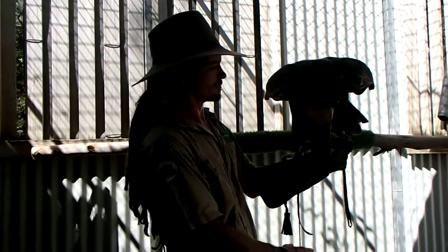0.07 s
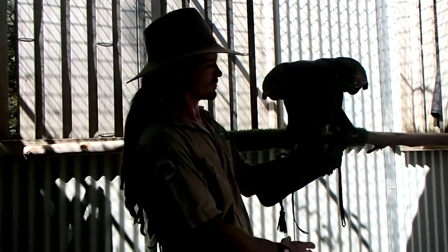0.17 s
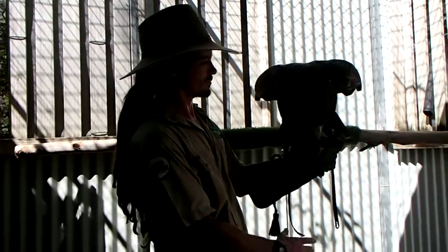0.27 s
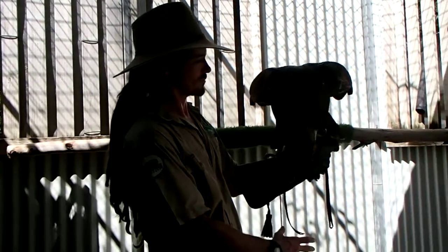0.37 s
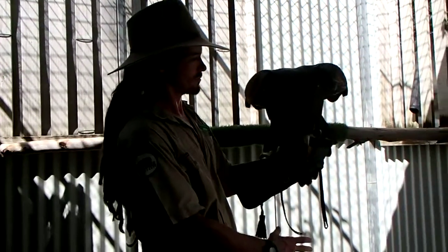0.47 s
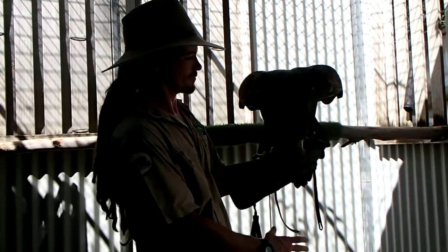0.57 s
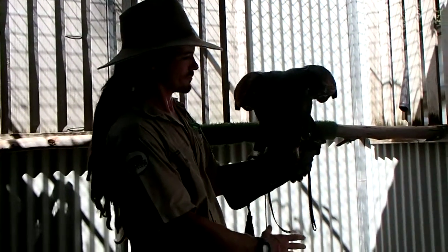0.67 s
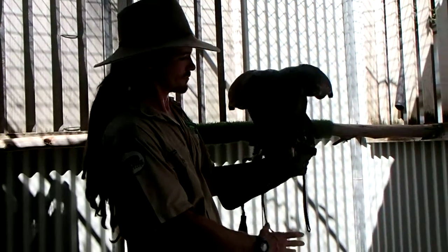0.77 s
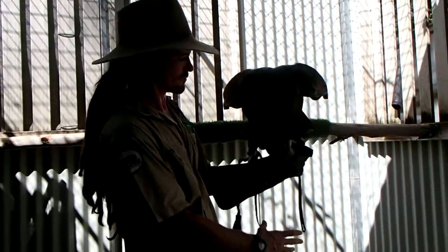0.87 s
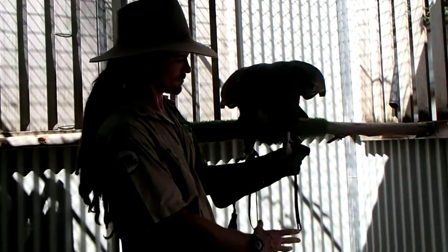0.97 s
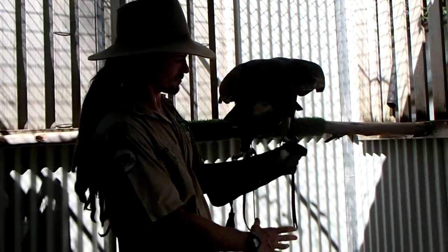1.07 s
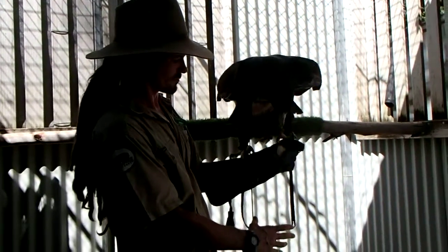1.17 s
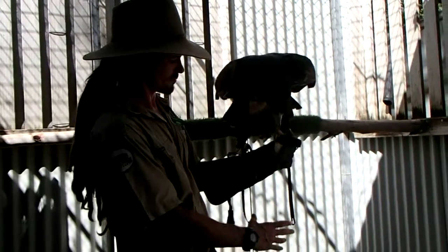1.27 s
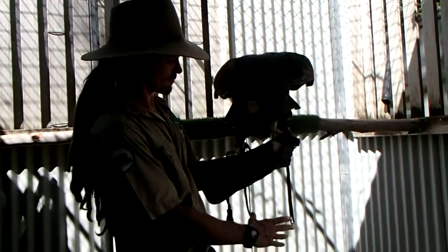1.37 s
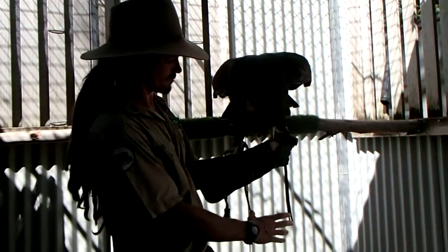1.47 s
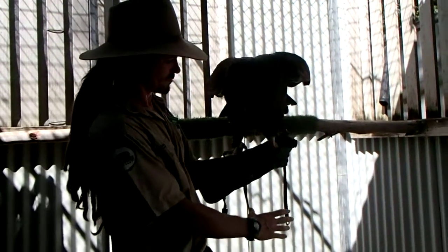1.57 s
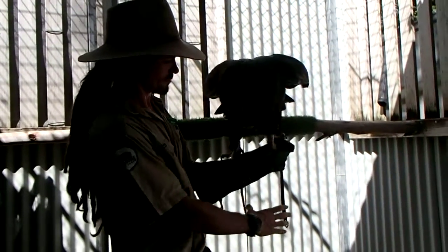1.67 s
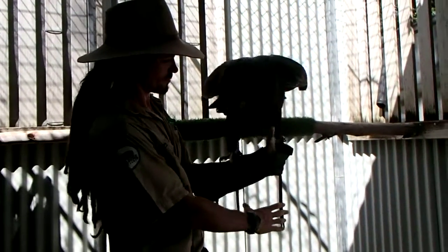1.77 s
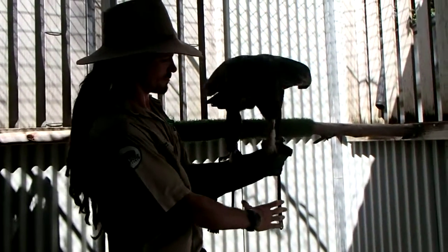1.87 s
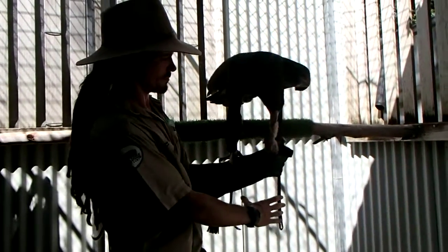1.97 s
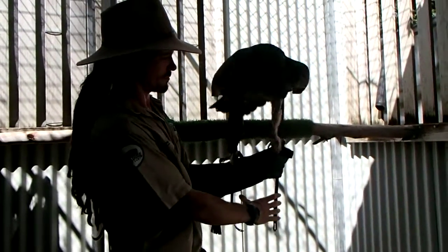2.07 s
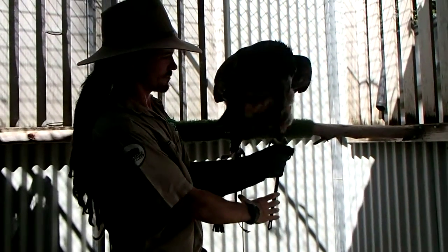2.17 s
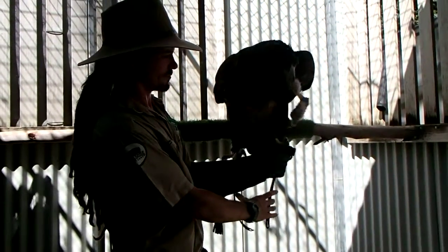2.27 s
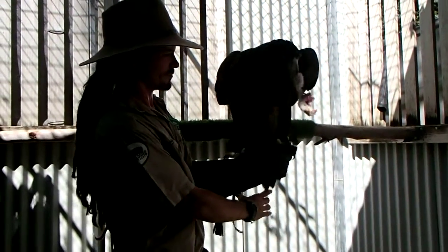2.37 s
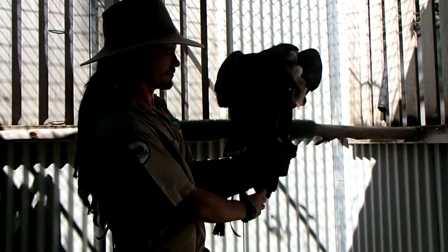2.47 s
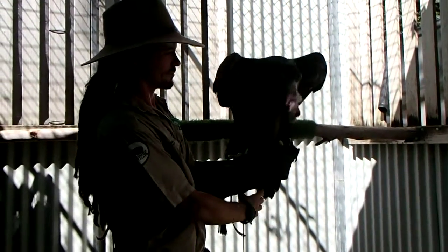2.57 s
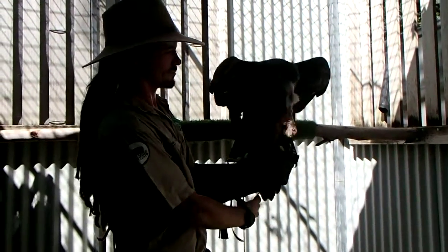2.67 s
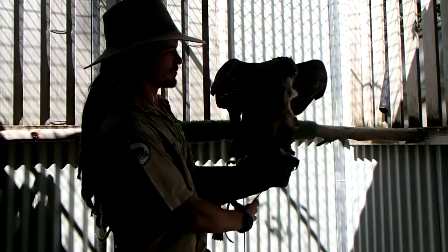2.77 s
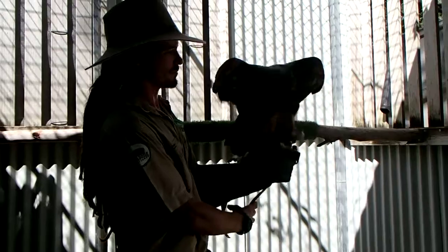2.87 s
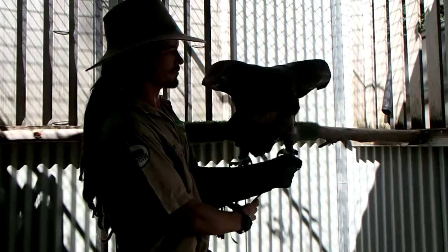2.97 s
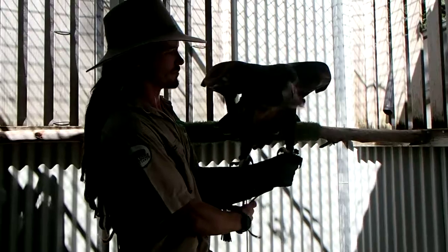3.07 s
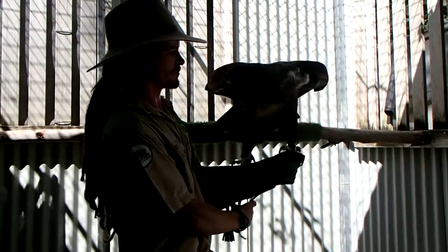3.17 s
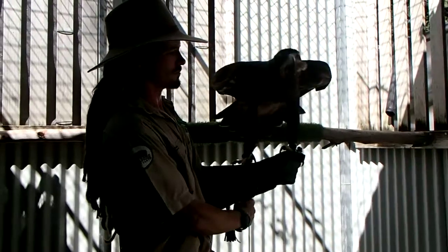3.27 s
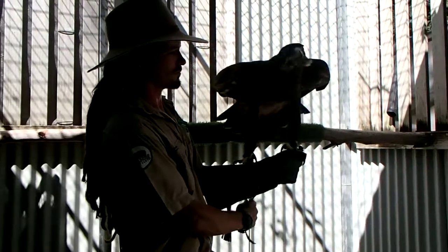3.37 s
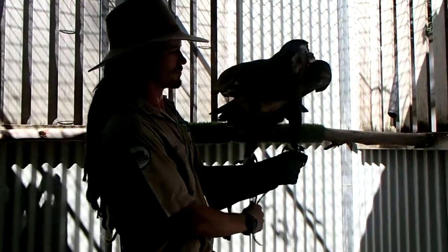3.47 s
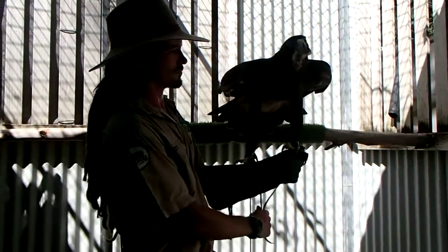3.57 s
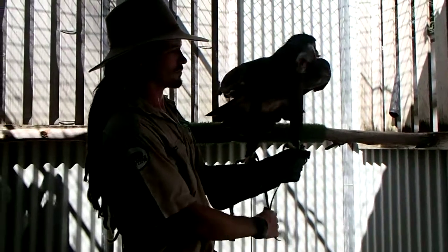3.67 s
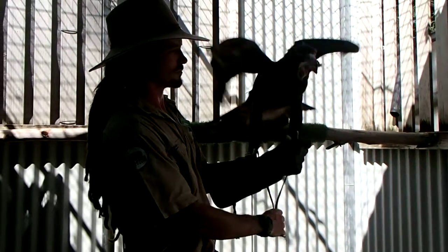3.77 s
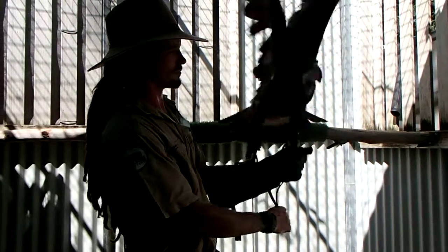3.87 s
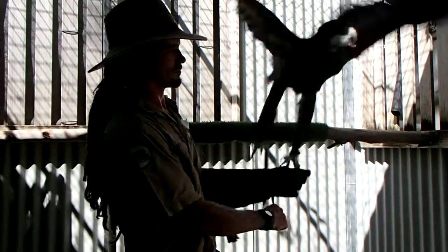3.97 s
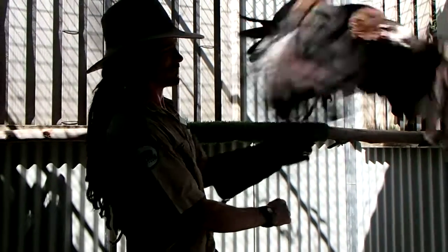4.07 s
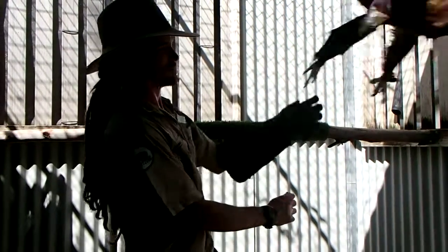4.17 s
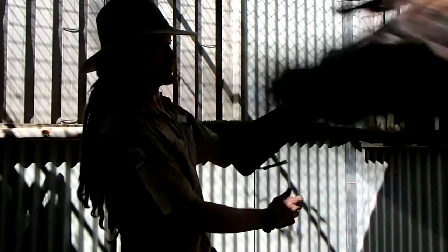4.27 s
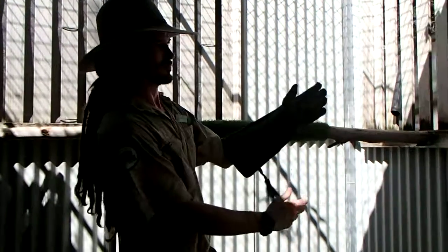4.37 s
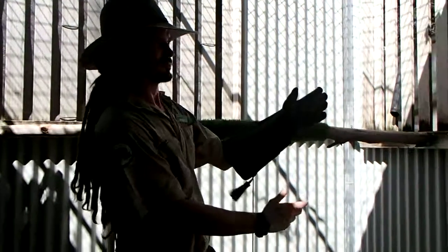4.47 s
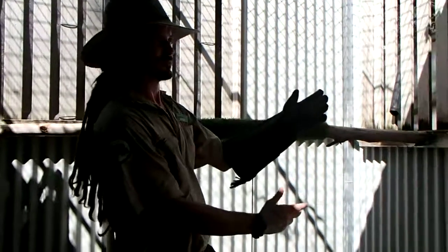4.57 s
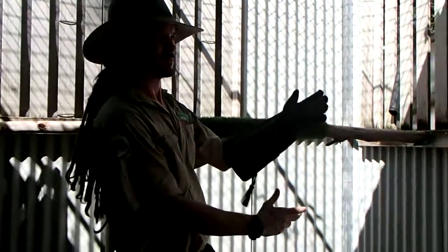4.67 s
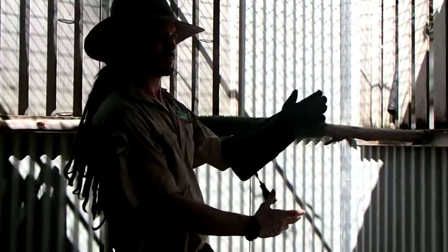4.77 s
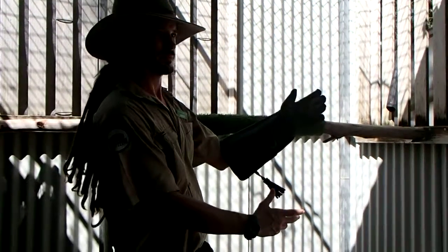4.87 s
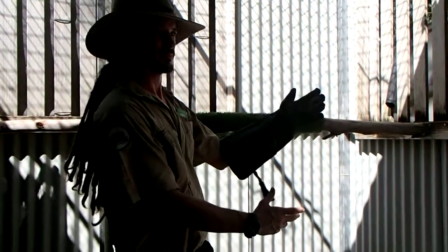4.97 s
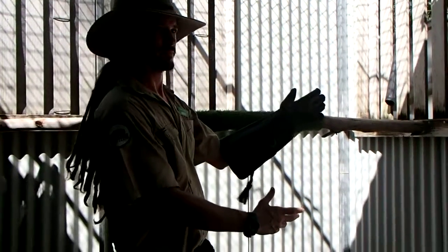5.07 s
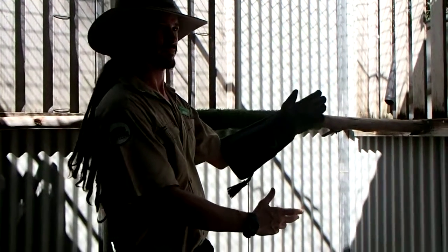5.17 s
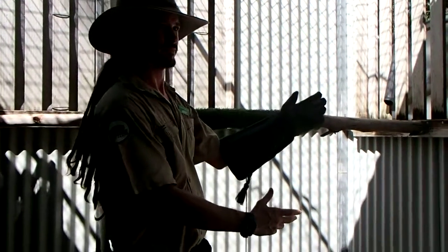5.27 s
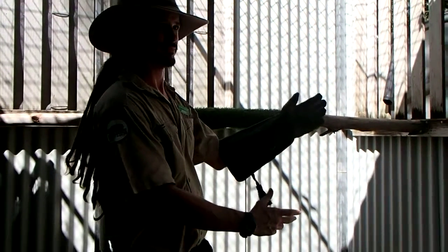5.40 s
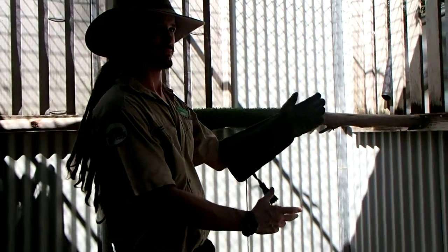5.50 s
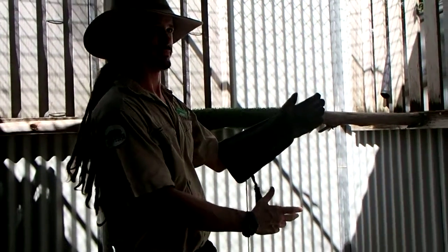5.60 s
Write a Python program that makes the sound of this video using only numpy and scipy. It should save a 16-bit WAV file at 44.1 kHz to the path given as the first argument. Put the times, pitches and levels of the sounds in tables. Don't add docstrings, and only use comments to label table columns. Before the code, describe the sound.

Quiet open air with a faint far motor and thin, high bird notes. Soft evenly spaced knocks and a plasticky tick come first, then light feather shuffles and tiny strap clicks. Suddenly wings explode into dry snaps and grainy whooshes very near the microphone, followed by low lumpy air bumps. Later strokes are softer, with scratchy claw rasps; the snaps get a short reflection from the aviary walls.

```python
import sys
import numpy as np
from scipy import signal
from scipy.fft import rfft, irfft, next_fast_len
from scipy.io import wavfile
from scipy.ndimage import uniform_filter1d

SR = 44100
rng = np.random.default_rng(int(sys.argv[2]) if len(sys.argv) > 2 else 0)


def dump(signal):
    limited = np.clip(np.atleast_2d(signal).T, -1, 1)
    pcm = np.round(limited * 32767).astype(np.int16)
    wavfile.write(sys.argv[1], SR, pcm)


def volts_from_decibels(level):
    exponent = np.asarray(level, float) / 20
    return 10 ** exponent


N = 248724
T = np.arange(N) / SR


def unit(x):
    return x / np.sqrt(np.mean(x ** 2) + 1e-20)


def along(points, hz):
    f, v = np.transpose(points)
    return np.interp(np.log(hz + 1), np.log(f + 1), v)


def wobble(rate):
    knots = rng.standard_normal(round(N / SR * 600))
    return np.interp(T * rate, np.arange(len(knots)), knots)


def filtered(x, response):
    m = next_fast_len(x.shape[-1] + 4096, True)
    spectrum = rfft(x, m) * response(np.fft.rfftfreq(m, 1 / SR))
    return irfft(spectrum, m)[..., :x.shape[-1]]


def resonance(centre_hz, width_hz):
    return lambda f: 1j * f * width_hz / (centre_hz ** 2 - f * f + 1j * f * width_hz)


def rush(spectrum, patchy_db, grain_db):
    grains = rng.standard_normal(N) * volts_from_decibels(grain_db * wobble(500))
    z = signal.stft(grains, nperseg=256)[2]
    field = uniform_filter1d(rng.standard_normal(z.shape), 5, axis=0)
    field = uniform_filter1d(field, 8, axis=1)
    noise = signal.istft(z * volts_from_decibels(patchy_db * unit(field)), nperseg=256)[1][:N]
    return unit(filtered(noise, lambda hz: volts_from_decibels(along(spectrum, hz))))


def swells(rows):
    s, db, rise, fall = np.transpose(rows)[:, :, None]
    ms = T[::44]
    down_db = 20 * np.maximum((s - ms) / rise, (ms - s) / fall)
    return np.interp(T, ms, np.sqrt(np.sum(volts_from_decibels(2 * db - down_db), axis=0)))


# (frequency [Hz], density [dB per Hz])
AIR = [(25, -29), (60, -17.5), (108, -5.5), (200, -9.5), (516, -9.5), (754, -4.5), (1290, -5.5),
       (1560, -8.5), (2600, -8), (3400, -4.5), (4300, -8.5), (5300, -16), (13600, -23), (16000, -30)]
# (frequency [Hz], rms level [dB])
HUM = [(104, -73), (139, -70)]


def air():
    bed = volts_from_decibels(-50.5 + 0.27 * wobble(8.3)) * rush(AIR, 1.2, 0.55)
    for hz, db in HUM:
        level = volts_from_decibels(db + 2 + 1.6 * wobble(3.73))
        bed = bed + level * np.sin(2 * np.pi * hz * T + 0.55 * wobble(3.9))
    return bed


# (time [s], peak level [dB], t60 [s])
QUILLS = [(.0166, -38, .02), (.505, -37.5, .02), (1.5564, -46, .02), (3.8585, -30, .015),
          (3.906, -24, .017), (3.9613, -12.5, .027), (3.9664, -15.5, .02), (3.9911, -7.5, .016),
          (4.0005, 3, .014), (4.0055, -4, .031), (4.0108, -12, .03), (4.1054, -16, .015),
          (4.4912, -24, .035), (4.5295, -18, .0093), (4.534, -11, .023)]
TIP_FLICKS = [(1.9844, -42, .01), (2.4111, -32, .012), (2.9282, -38, .012), (3.9967, -1.5, .012),
              (4.0194, -12.5, .02), (4.2115, -4, .022), (4.267, -5.5, .019), (4.275, -9, .025)]
STRAP_TICKS = [(1.649, -33, .015), (2.725, -36, .012), (2.7574, -22, .013), (4.2158, -24, .028),
               (4.282, -14, .025)]
FIZZ = [(2.4105, -45, .025), (3.9965, -23, .015), (4.002, -30, .09), (4.212, -33, .12), (4.268, -32, .12),
        (4.447, -38, .015), (4.619, -36, .012)]
SLAPS = [(1.8889, -45, .02), (4.7694, -27, .0052), (4.799, -27, .017), (4.8758, -18.5, .0025),
         (5.142, -34, .038)]
# (its snaps, dull part [dB re peak], bright part [dB re peak])
KINDS = [(QUILLS, -6.5, -18), (TIP_FLICKS, -12, -8), (STRAP_TICKS, -21, -17), (SLAPS, 6.5, -15),
         (FIZZ, -20, 16)]


def snaps():
    out, t = np.zeros(N + SR), np.arange(2048) / SR
    rows = sorted((*snap, dull_db, bright_db) for kind, dull_db, bright_db in KINDS for snap in kind)
    crackle = rng.standard_normal((len(rows), len(t)))
    crackle[:, 0] = 2.6
    s, db, t60, dull_db, bright_db = np.transpose(rows)[:, :, None]
    dull, middle, bright = resonance(1340, 2070), resonance(3050, 2260), resonance(11500, 14000)

    def colour(f):
        low = volts_from_decibels(dull_db + 5.5) * dull(f) ** 2
        high = volts_from_decibels(bright_db - 14) * bright(f) ** 2
        return volts_from_decibels(2.5) * middle(f) ** 2 - low + high

    sounds = filtered(crackle * volts_from_decibels(db - 60 * t / t60), colour)
    for start, sound in zip(s[:, 0], sounds):
        out[round(start * SR):][:len(t)] += sound
    return out[:N]


# (time [s], rise [s], fall of 20 dB [s], level [dB], resonance [Hz])
SCRAPE = [(.03, .017, .03, -40.5, 950), (.04, .015, .05, -48, 2050), (1.705, .0036, .1, -52, 900),
          (1.889, .0032, .06, -50, 750), (1.984, .002, .006, -56, 6000), (2.41, .003, .04, -48, 2750),
          (2.758, .003, .02, -36.5, 3030), (2.931, .053, .3, -56, 4000), (3.45, .1, .5, -61, 5200),
          (4.535, .006, .1, -29.5, 3350), (5.268, .0079, .1, -35.5, 1000), (5.302, .015, .15, -29.5, 3260),
          (5.381, .012, .35, -31.5, 1070), (5.523, .0085, .08, -32, 1030)]


def scrape():
    out, t, rows = np.zeros(N + SR), np.arange(SR // 3) / SR, SCRAPE + swivel()
    for (s, rise, fall, db, hz), noise in zip(rows, rng.standard_normal((len(rows), len(t)))):
        shape = np.minimum(t / rise, volts_from_decibels(-20 * (t - rise) / fall))
        body = resonance(hz, 450 * (hz / 1000) ** .25)
        rasp = shape * filtered(noise, lambda f: body(f) ** 2)
        out[round(s * SR):][:len(t)] += volts_from_decibels(db) * rasp * np.linalg.norm(shape) / np.linalg.norm(rasp)
    return out[:N]


# (frequency [Hz], density [dB per Hz])
VANES = [(880, -33), (1500, -5.5), (2180, -3), (2350, -5), (3030, 1), (4480, -4), (5490, -14.5),
         (9000, -31.5), (11700, -38), (19800, -120)]
BODY = [(120, -45), (200, -12), (455, -7), (529, -8.5), (591, -4), (823, -1), (1080, -1.5), (2200, -8),
        (2860, -10), (4840, -120)]
TIPS = [(3530, -26), (6000, -1), (9310, -7), (14300, -6.5), (15200, -6), (16000, -35)]
# (peak time [s], rush [dB], rise of 10 dB [s], fall of 10 dB [s], wing body [dB re rush])
SHUFFLES = [(.046, -44.5, .048, .06, -3), (1.576, -55, .04, .04, 1), (1.654, -52, .02, .15, -10),
            (2.178, -44, .085, .018, -11), (3.0, -56, .08, .15, -13)]
STROKES = [(3.84, -40, .1, .2, -8), (3.94, -41, .06, .05, 0), (4.012, -30.5, .08, .15, -5),
           (4.103, -26, .07, .085, -6), (4.218, -28, .012, .04, -6), (4.285, -31, .035, .04, -3),
           (4.362, -29.5, .055, .06, -3), (4.425, -36, .05, .05, -3), (4.494, -33.5, .025, .035, -7),
           (4.55, -35, .04, .1, -6), (4.635, -33, .05, .07, -8), (4.75, -40, .08, .045, -8),
           (4.815, -39, .035, .09, -1), (5.03, -47.5, .3, .25, -4), (5.155, -37, .015, .11, 2.5),
           (5.33, -36, .05, .08, -5), (5.43, -33, .09, .09, 0), (5.54, -40, .06, .17, 1.5)]
# (time [s], level [dB re rush])
TIPS_DB = [(.1, -27), (.4, -13), (4.7, -14), (4.9, -21), (5.2, -26.5)]


def feathers():
    flutter = volts_from_decibels(0.8 * wobble(35))
    vanes, body, tips = rush(VANES, 1.43, 1.4), rush(BODY, 1.7, 1.9), rush(TIPS, 1.36, 2.1)
    rows = SHUFFLES + STROKES
    slide = swells([row[:-1] for row in rows])
    whoosh = swells([(s, db + body_db, rise, fall) for s, db, rise, fall, body_db in rows])
    tips_db = np.interp(T, *np.transpose(TIPS_DB))
    hiss = volts_from_decibels(tips_db + 1.71) * tips
    return flutter * (slide * (vanes + hiss) + volts_from_decibels(2.0) * whoosh * body)


# (time [s], length [s], start pitch [Hz], end pitch [Hz], rms level [dB])
WHISTLES = [(.1, .06, 5400, 5420, -68), (.3, .19, 5140, 5100, -67), (.43, .09, 4020, 3960, -59),
            (.64, .043, 2950, 2915, -59), (.73, .08, 2880, 2880, -58), (1.0, .45, 6250, 6300, -73),
            (1.18, .05, 2950, 2960, -60), (2.1, .08, 4020, 4080, -57), (2.12, .07, 3280, 3250, -56),
            (2.413, .075, 3270, 3300, -55), (2.445, .05, 2750, 2770, -55.5), (2.47, .16, 2760, 2720, -59.5),
            (2.62, .12, 2690, 2610, -63), (2.5, .14, 5520, 5560, -68), (2.52, .08, 4280, 4240, -60),
            (2.61, .08, 4260, 4400, -56.5), (2.69, .08, 4340, 4360, -58.5), (2.64, .065, 5300, 5178, -65),
            (2.7, .07, 5550, 5750, -66), (2.85, .05, 3600, 3580, -62), (3.09, .09, 2960, 2950, -59.5),
            (.32, .25, 189, 186, -67), (.3, .13, 389, 385, -69), (.6, .2, 182, 178, -70)]


def whistles():
    out, waver = np.zeros(N), 1.6 * wobble(80)
    for s, length, start_hz, end_hz, db in WHISTLES + chorus():
        u = np.linspace(0, 1, round(length * SR))
        start = round(s * SR)
        phase = 2 * np.pi * length * (start_hz * u + (end_hz - start_hz) * u * u / 2)
        phase = phase + start_hz / 3500 * waver[start:][:len(u)]
        swell = np.abs(np.sin(np.pi * u)) ** 0.34
        out[start:][:len(u)] += volts_from_decibels(db + 3.0) * swell * np.sin(phase)
    return out * volts_from_decibels(1.9 * wobble(60))


# (rate [notes a second], lowest pitch [Hz], highest pitch [Hz], rms level [dB])
CHORUS = (14, 2600, 5300, -70)


def chorus():
    rate, low_hz, high_hz, db = CHORUS
    when, span, pitch, bend, size = rng.uniform(size=(round(rate * N / SR), 5)).T
    hz = low_hz * (high_hz / low_hz) ** pitch
    end_hz = hz * (1.02 - .04 * bend)
    return list(zip(when * (N / SR - .2), .03 + .09 * span, hz, end_hz, db + 6 * size - 3))


# (first time [s], period [s], number of knocks, level [dB])
SWIVEL = (0.3, .1342, 6, -51)


def swivel():
    first, period, knocks, db = SWIVEL
    return [(first + k * period, .004, .014, db, 1300) for k in range(round(knocks))]


# (time [s], peak level [dB])
TAP = [(1.3493, -15), (1.35, -6)]
# (frequency [Hz], width [Hz], level [dB])
CASE = [(250, 250, -9), (735, 104, -1.5), (1420, 120, -4), (3300, 270, -0.5), (4400, 430, -8),
        (5750, 460, -7.5), (8800, 610, -34), (12600, 1500, -40)]


def tap():
    blow = np.zeros(N)
    for s, db in TAP:
        blow[round(s * SR)] = volts_from_decibels(db + 23.5)

    def case(f):
        return sum((-1) ** k * volts_from_decibels(db) * resonance(c, w)(f) for k, (c, w, db) in enumerate(CASE))

    return filtered(blow, case)


# (peak time [s], level [dB], rise of 10 dB [s], fall of 10 dB [s])
GUSTS = [(4.23, -45, .15, .2), (4.43, -44, .15, .1), (4.53, -34, .08, .06), (4.584, -23.5, .025, .014),
         (4.67, -29, .025, .045), (4.765, -36, .015, .15), (4.87, -36, .1, .06), (5.022, -31, .035, .06),
         (5.11, -33, .05, .05), (5.155, -31, .03, .05), (5.248, -31, .03, .025), (5.418, -39, .2, .1),
         (5.63, -41, .15, .2)]
# (frequency [Hz], density [dB per Hz])
BUFFET = [(15, -45), (35, -22), (90, -0.5), (160, 1.5), (300, -6), (500, -18), (900, -35), (1500, -120)]
# (time [s], peak level [dB], frequency [Hz], life [cycles])
EDDIES = [(4.001, -33.5, 130, .3), (4.495, -28, 220, .66), (4.5675, -7.5, 215, .78), (4.5712, -12, 680, .6),
          (4.5752, -7.5, 850, .8), (4.5782, -5.5, 800, 1.1), (4.6499, -13, 704, 1.35),
          (4.6668, -7, 677, .93), (4.7035, -21, 250, .9), (4.7684, -6, 830, .73), (4.7707, -6.5, 480, .5),
          (4.8078, -8.5, 620, .47), (4.8131, -8.5, 685, 1.35), (4.8166, -10, 900, .6),
          (4.8225, -16, 480, .8), (4.8764, -1, 747, .73), (4.895, -28, 300, 1.2), (4.92, -26, 330, .95),
          (4.94, -23, 600, 1.16), (5.004, -24, 520, 1.4), (5.031, -25, 620, 1.2), (5.085, -27, 330, 1.8),
          (5.113, -27, 295, 1.8), (5.1533, -11, 960, .9), (5.1582, -6, 604, .65), (5.18, -26, 380, .9),
          (5.2482, -14.5, 265, .54), (5.2531, -16, 265, .8), (5.386, -23, 334, .6), (5.419, -29, 194, 1.25)]
# (offset [s], level [dB re eddy], highest frequency [Hz], life [cycles])
ROLLS = [(-.0044, -11.5, 290, .6), (.0048, -14, 400, .6)]


def downwash():
    lumps = unit(volts_from_decibels(4.2 * wobble(45)) * rush(BUFFET, 1.2, .1))
    out = swells(GUSTS) * volts_from_decibels(-3.0) * lumps
    rolls = [(s + offset, db + loss_db, min(hz, roll_hz), life)
             for s, db, hz, _ in EDDIES for offset, loss_db, roll_hz, life in ROLLS]
    for s, db, hz, life in EDDIES + rolls:
        phase = rng.uniform(0, 2 * np.pi)
        near = slice(round(s * SR) - 1000, round(s * SR) + 1000)
        cycle = (T[near] - s) * hz
        passing = np.exp(-1.3 * np.abs(cycle / life) ** 1.5)
        out[near] += volts_from_decibels(db) * passing * np.cos(2 * np.pi * cycle + phase)
    return out


# (frequency [Hz], t60 [s])
AVIARY = [(300, 0.21), (3000, 0.18), (12000, 0.14)]


def aviary(x):
    hz, t, z = signal.stft(rng.standard_normal(SR // 2), SR, nperseg=256)
    decay = volts_from_decibels(-60 * t / along(AVIARY, hz)[:, None])
    tail = signal.istft(z * decay, SR, nperseg=256)[1]
    late = np.pad(x, (300, 0))
    return signal.fftconvolve(late, tail / np.linalg.norm(tail))[:N]


def scene():
    cracks, birds, rasps = snaps(), whistles(), scrape()
    wet = volts_from_decibels(-12) * aviary(cracks + volts_from_decibels(7.5) * birds + volts_from_decibels(-2) * rasps)
    return (feathers() + rasps + cracks + birds + wet + tap() + downwash() + air())[None]


def band_limit(x):
    return signal.sosfilt(signal.butter(12, 16810, fs=SR, output="sos"), x)


def record(dry):
    held = dry / (1 + np.abs(dry / .99) ** 6) ** (1 / 6)
    held = filtered(held, lambda hz: 1 / (1 + (hz / 16000) ** 60))
    return band_limit(held - .0005)


dry = scene()
out = record(dry)
dump(out)
```